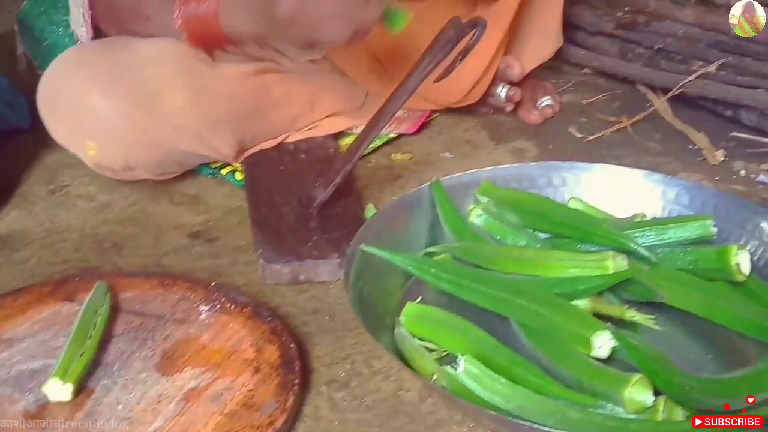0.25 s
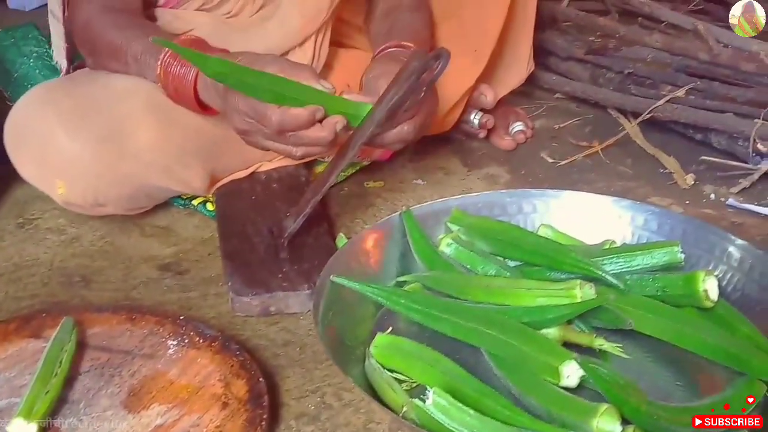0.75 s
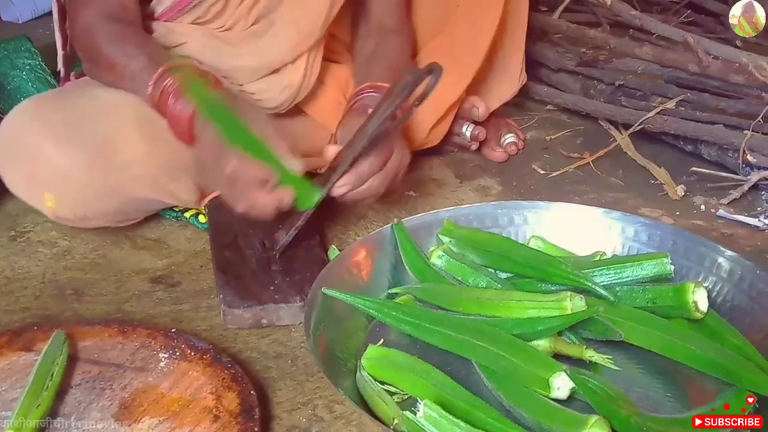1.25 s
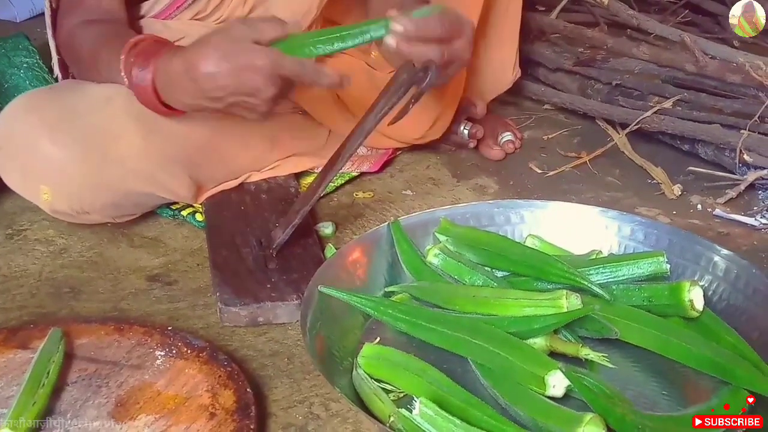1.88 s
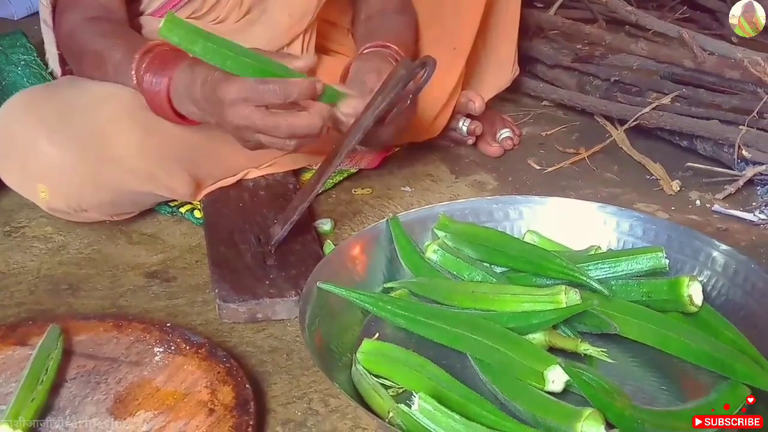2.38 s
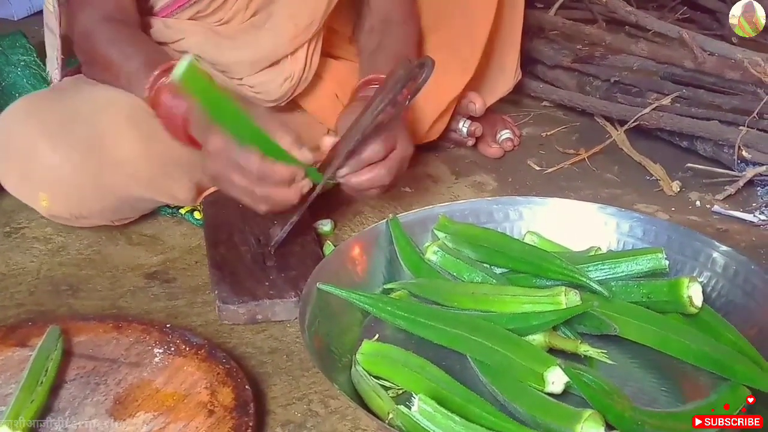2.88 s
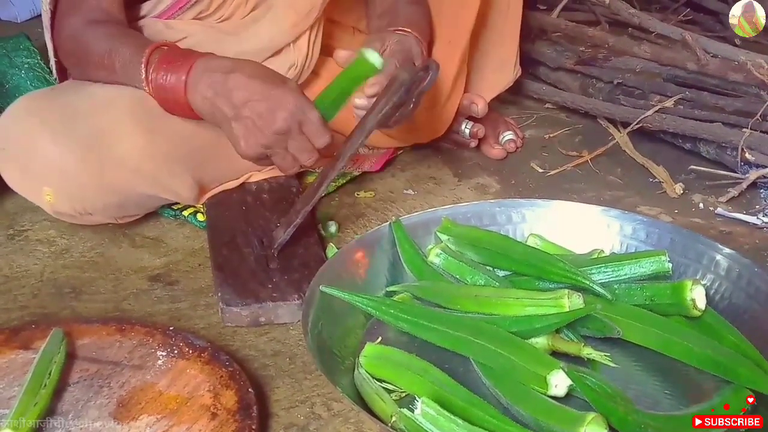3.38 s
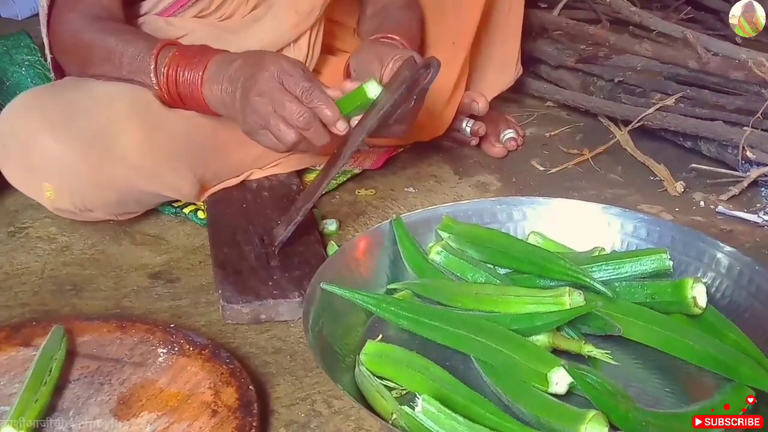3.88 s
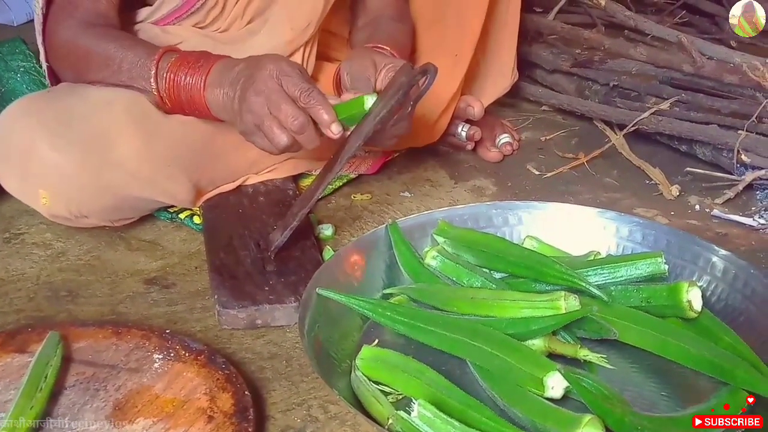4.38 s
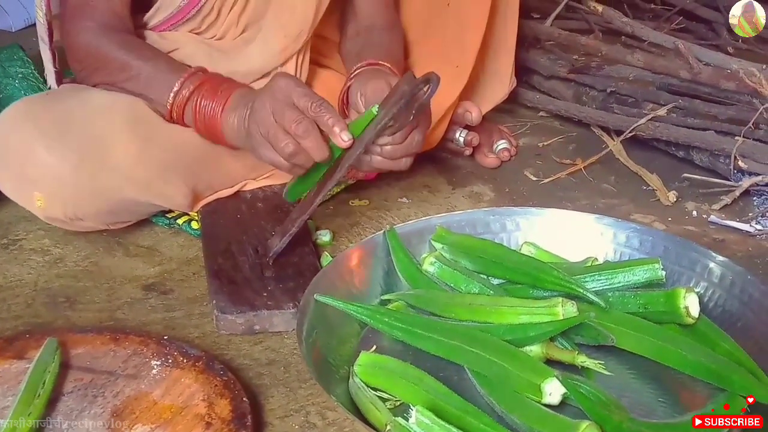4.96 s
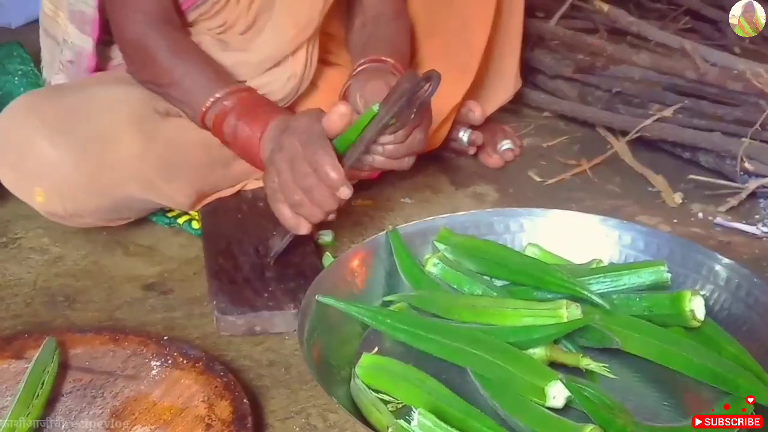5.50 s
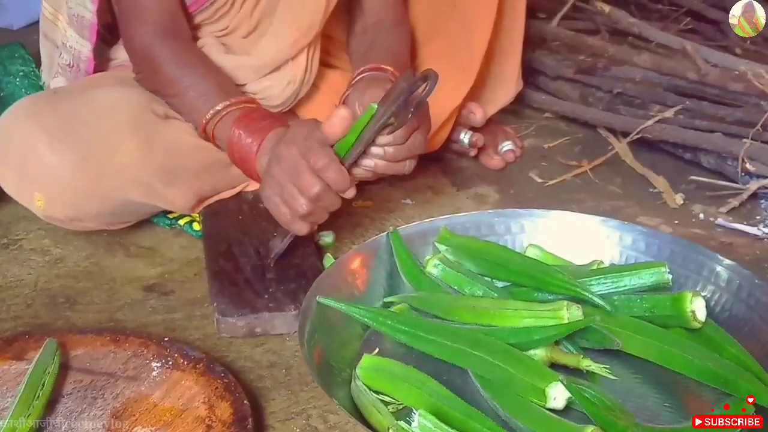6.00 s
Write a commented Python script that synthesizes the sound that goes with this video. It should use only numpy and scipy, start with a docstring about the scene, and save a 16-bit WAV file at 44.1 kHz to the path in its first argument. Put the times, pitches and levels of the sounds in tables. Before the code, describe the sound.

Hens cluck constantly in short hoarse notes, with occasional louder squawks and faint whines. Close by, okra skin rasps on a fixed iron blade and the pods snap in crisp crackles, while glass bangles clink high and bright and cloth rustles softly. A low uneven hum and a few dull thuds join halfway. Mono microphone near the hands in a hard-walled yard with short echoes, the pauses cleaned of hiss.

```python
"""Hens squawk and cluck in a hard-walled yard while cloth and hands rustle and glass bangles clink throughout.
Okra pods rasp and snap on a fixed blade: filtered noise with uneven pressure or a dying crackle.
Hen voices are rough pulses through beak resonances; bangles ring in modes.
A low uneven hum of filtered noise comes up halfway through, with a few dull sine thuds.
Sparse echoes surround the hens, the pods and the bangles; a noise suppressor and a band limit end the chain."""
import sys
import numpy as np
from scipy import signal
from scipy.fft import rfft, irfft, next_fast_len
from scipy.io import wavfile
from scipy.ndimage import uniform_filter1d, map_coordinates

SR = 44100
rng = np.random.default_rng(int(sys.argv[2]) if len(sys.argv) > 2 else 0)


def generate_wav(sig):
    """Save sig (samples, or channels by samples) to the path in sys.argv[1] as 16-bit PCM at SR."""
    pcm = np.round(np.clip(np.atleast_2d(sig).T, -1, 1) * 32767).astype(np.int16)
    wavfile.write(sys.argv[1], SR, pcm)


N = 275184
TIME = np.arange(N) / SR  # s

# throat with the beak nearly shut: (frequency [Hz], level [dB])
SHUT_BEAK_SPECTRUM = [(150, -54), (320, -5.5), (480, -10.5), (700, -11.5), (960, 2.5), (1150, -13),
                      (1420, -0.5), (1750, -51), (2400, -32), (3100, -23.5), (4800, -22.5), (6500, -32.5),
                      (10000, -33.5), (15000, -52)]
CHEST_PER_DB = 0.94  # dB of chest tone per dB of call level
UNSTEADY, UNSTEADY_HZ = 0.011, 70.15  # chance bends of the pitch: share and rate


def amp(db):
    """Decibels to gain."""
    return 10 ** (np.asarray(db) / 20)


def unit(x):
    """Scales to rms 1."""
    return x / np.sqrt(np.mean(x ** 2) + 1e-20)


def read(points, hz):
    """Reads a table on a log-frequency axis."""
    f, value = np.transpose(points)
    return np.interp(np.log(hz + 1), np.log(f + 1), value)


def add(mix, s, sound):
    """Mixes a sound in at time s."""
    part = mix[max(0, round(s * SR)):][:len(sound)]
    part += sound[:len(part)]


def colour(x, points, tilt_db=0):
    """Filters by a spectrum, tilted in dB per octave; rms 1."""
    size = next_fast_len(len(x) + 1024)
    hz = np.fft.rfftfreq(size, 1 / SR)
    gain = amp(read(points, hz) + tilt_db * np.log2(1 + hz / 500))
    return unit(irfft(rfft(x, size) * gain, size)[:len(x)])


def waver(count, hz):
    """Smooth chance of rms about 1, changing hz times a second."""
    at = np.arange(count) * hz / SR
    return map_coordinates(rng.standard_normal(4096), [at + 2], order=2, mode="wrap")


def resonate(x, hz, width):
    """A resonance that follows the curve hz, applied twice for steep sides; rms 1."""
    turn = np.exp(2j * np.pi * np.cumsum(hz) / SR)
    r = np.exp(-np.pi * width / SR)
    # shift the resonance to 0 Hz, low-pass with a double pole, shift back
    low = signal.lfilter([1], [1, -2 * r, r * r], x / turn)
    return unit((turn * low).real)


def yard(x, wet_db):
    """Adds the echoes of walls and ground: sparse taps, each band dying at its own speed."""
    # (frequency [Hz], t60 [s])
    decay_points = [(150, 0.15), (500, 0.23), (1200, 0.39), (5000, 0.39), (9000, 0.3), (15000, 0.087)]
    slots = np.arange(130, SR - 22, 22)
    taps = np.zeros(SR)
    taps[slots + rng.integers(0, 22, len(slots))] = rng.choice([-1., 1.], len(slots))
    hz, t, z = signal.stft(taps, SR, nperseg=256)
    decay = amp(-60 * t / read(decay_points, hz)[:, None])
    tail = signal.istft(z * decay, SR, nperseg=256)[1]
    wet = signal.fftconvolve(x, tail / np.linalg.norm(tail))[:N]
    return (x + amp(wet_db) * wet) / np.hypot(1, amp(wet_db))


def background():
    """Hands and cloth rustle in shifting patches over very still air."""
    # (time [s], level [dB])
    rustle_levels = [(0, -54), (.4, -72.5), (.9, -63.5), (1.35, -70), (1.9, -90), (2.7, -58.5),
                     (3.1, -62.5), (3.35, -65.5), (4.1, -59), (4.6, -58), (5.2, -66), (5.5, -58.5),
                     (5.9, -57.5), (6.24, -65.5)]
    # (frequency [Hz], level [dB per Hz])
    rustle_spectrum = [(60, -49), (200, -13), (350, -5), (700, 6.5), (1100, 1), (1800, -0.5), (2400, 1),
                       (3100, -12), (4500, 4.5), (6000, 3.5), (8000, -10), (11000, -5), (16000, -52)]
    # (frequency [Hz], level [dB per Hz])
    air_spectrum = [(30, 10.5), (150, 19), (400, 11), (1000, -30), (4000, 6.5), (15000, 2)]
    z = signal.stft(colour(rng.standard_normal(N), rustle_spectrum), nperseg=1024)[2]
    patches = uniform_filter1d(rng.standard_normal(z.shape), size=6, axis=0)
    patches = unit(uniform_filter1d(patches, size=8, axis=1))
    rustle = unit(signal.istft(z * amp(4.5 * patches), nperseg=1024)[1][:N])
    air = amp(-68) * colour(rng.standard_normal(N), air_spectrum)
    return amp(np.interp(TIME, *np.transpose(rustle_levels))) * rustle + air


def bangles():
    """Each clink rings two glass hoops of different size, and their neighbours on the wrist chatter along."""
    # two bangles meet: (time [s], relative level [dB], ring of the struck one [Hz],
    # ring of its neighbour [Hz], relative level of the lower modes [dB])
    clink_table = [(.014, -43.5, 14500, 12040, 5.5), (.065, -49.5, 12500, 10000, -14),
                   (.0995, -41, 12230, 9680, -2.5), (0.204, -50, 10660, 12070, 1.5),
                   (.786, -56.5, 14300, 9450, 3), (1.236, -47, 11250, 12500, 2.5),
                   (1.602, -62.5, 10840, 11810, 8), (2.86, -53, 13760, 9840, -10),
                   (3.1313, -49.5, 10700, 12100, 1), (3.17, -54, 10760, 12300, 4),
                   (3.493, -52.5, 13700, 9770, -8), (3.642, -56, 10970, 15500, -13),
                   (4.441, -56, 12200, 9680, 6.5), (4.849, -57, 14400, 10300, 1),
                   (5.179, -52, 10190, 11700, -4.5), (5.433, -49.5, 10630, 11300, -16),
                   (5.517, -49, 10800, 12100, 2.5), (5.585, -47, 11580, 10640, -1),
                   (5.626, -46.5, 9990, 15300, -21), (5.831, -46, 9800, 15400, -6),
                   (5.9569, -53, 12780, 9840, 0), (6.124, -42, 10930, 11860, 1)]
    # modes of a bangle: (multiple of its main ring, relative level [dB], t60 [s])
    mode_table = [(1, 0, 0.22), (.93, 3.5, 0.049), (1.07, -3.5, 0.14), (.526, 0, 0.15), (.49, -1, 0.067)]
    # glass on glass: (frequency [Hz], level [dB per Hz])
    tick_spectrum = [(300, -72), (2500, -40), (5500, -3.5), (8000, 0), (12000, -1)]
    neighbour_db = -6.5  # main modes and tick of the neighbour against the struck one
    out, t = np.zeros(N), np.arange(SR // 3) / SR
    for s, clink_db, struck_hz, neighbour_hz, low_db in clink_table:
        for hz, db in ((struck_hz, clink_db), (neighbour_hz, clink_db + neighbour_db)):
            for ratio, mode_db, t60 in mode_table:
                # both hoops share one level for their lower modes
                strike_db = db + 2 if ratio > .7 else clink_db + low_db - 3
                ring = np.sin(2 * np.pi * (hz * ratio * t + rng.random()))
                mode_hz = np.full(len(t), hz * ratio)
                chatter = resonate(rng.standard_normal(len(t)), mode_hz, width=490)
                decay = amp(strike_db + mode_db - 60 * t / t60)
                add(out, s, decay * (.6 * ring + .55 * chatter))
            tick = colour(rng.standard_normal(len(t)), tick_spectrum) * np.exp(-t / 0.0087)
            add(out, s, amp(db - 0.5) * tick)
    high_pass = signal.butter(4, 3000, "high", fs=SR, output="sos")
    return yard(signal.sosfilt(high_pass, out), wet_db=-2.5)


def syrinx(hz, rough, jitter, doubling, chest_db=0):
    """Jittery pulses, alternately strong and weak, with a puff of air in each cycle."""
    count = len(hz)
    turns = np.cumsum(hz * (1 + jitter * rough ** 1.5 * waver(count, 420))) / SR
    # the windpipe delays each overtone differently, which spreads the pulse over its cycle
    overtones = sum(np.cos(2 * np.pi * (k * turns - rng.random())) for k in range(2, 19))
    # hoarseness shakes the overtones, while the chest tone stays clear
    shake = 1 + doubling * rough * np.cos(np.pi * turns) + 1.6 * rough ** 2 * waver(count, 260)
    folds = amp(chest_db) * np.cos(2 * np.pi * turns) + shake * overtones
    puffs = (0.082 + np.exp(-(turns % 1) / 0.22)) * rng.standard_normal(count)
    return (1 - rough) * unit(folds) + rough ** 2 * unit(puffs)


def squawks():
    """Loud calls: beak opens, pitch sags, mouth resonance slides, voice is hoarsest in mid-call."""
    # (time [s], length [s], relative level [dB], swell over the call [dB], first pitch [Hz],
    # pitch it sags towards [Hz], first mouth resonance [Hz], last mouth resonance [Hz],
    # upper resonance [Hz], its relative level [dB], roughness [0-1])
    squawk_table = [(0.063, 0.12, -39.5, -5, 730, 601.4, 1420, 1170, 2234, -10.5, 0.45),
                    (0.563, 0.18, -37, -2.5, 569.5, 449.6, 1170, 1300, 3820, -23, 0.52),
                    (2.901, 0.11, -38, 3, 772.3, 599, 1510, 1130, 2250, -11.5, 0.56),
                    (3.432, 0.1, -39, 4.5, 521, 403, 1150, 870, 4070, -24, 0.58),
                    (3.492, 0.12, -40.5, -6.5, 686, 510.2, 1570, 1520, 2470, -9.5, 0.53),
                    (3.754, 0.086, -39, 2.5, 549, 402, 1080, 750, 4150, -16.5, 0.58),
                    (4.182, .16, -31.5, 1, 562, 509.8, 1200, 1410, 4110, -20.5, 0.47)]
    # throat with the beak open: (frequency [Hz], level [dB])
    open_beak_spectrum = [(150, -21), (300, -10), (420, -0.5), (520, 2.5), (660, -6), (1000, -1.5),
                          (1500, 1.5), (1900, -8.5), (2600, -7), (3100, -12.5), (4200, -13.5), (6300, -17),
                          (8500, -23), (15000, -20.5)]
    attack_s, release_s, beak_open_s = 0.017, 0.019, 0.016
    sag_s = 0.04  # time constant
    clear_share = 0.65  # share of the roughness at either end
    average_db, chest_db, upper_q = -35.5, -1.5, 2.9
    # the harder the call, the more treble
    treble_db, treble_per_db, treble_hz = 1, 1.25, 3140
    high_pass = signal.butter(2, treble_hz, "high", fs=SR, output="sos")
    out = np.zeros(N)
    for (s, length, db, swell_db, first_hz, last_hz, first_mouth_hz, last_mouth_hz,
         upper_hz, upper_db, rough) in squawk_table:
        t = np.arange(0, length, 1 / SR)
        along = t / length
        hz = last_hz + (first_hz - last_hz) * np.exp(-t / sag_s)
        hz = hz * (1 + UNSTEADY * waver(len(t), UNSTEADY_HZ))
        mouth_hz = first_mouth_hz + (last_mouth_hz - first_mouth_hz) * along
        hoarse = rough * (clear_share + (1 - clear_share) * np.sin(np.pi * along))
        envelope = np.minimum(t / attack_s, 1) * np.minimum((length - t) / release_s, 1)
        opening = np.minimum(t / beak_open_s, 1)
        drive = syrinx(hz, np.clip(hoarse, 0, 1), jitter=.08, doubling=1.45,
                       chest_db=chest_db + CHEST_PER_DB * (db - average_db))
        throat = opening * colour(drive, open_beak_spectrum)
        throat = throat + (1 - opening) * colour(drive, SHUT_BEAK_SPECTRUM)
        mouth = resonate(drive, mouth_hz, width=710)
        upper = resonate(drive, np.full(len(t), upper_hz), width=upper_hz / upper_q)
        voice = 0.64 * throat + .5 * mouth + amp(upper_db) * upper
        level_db = db + swell_db * (along - .5)
        treble = signal.sosfiltfilt(high_pass, voice)
        treble_gain = opening * amp(treble_db + treble_per_db * (level_db - average_db))
        voice = voice - treble + treble * treble_gain
        add(out, s, amp(level_db) * envelope * unit(voice))
    return yard(out, wet_db=-1.5)


def clucks():
    """Short hoarse notes through a nearly shut beak: pitch and resonances arch, then sink as it closes."""
    # (time [s], length [s], relative level [dB], nominal mouth resonance [Hz])
    cluck_table = [(.279, 0.07, -43.5, 1230), (0.494, 0.051, -47.5, 1450), (0.52, .028, -39, 1090),
                   (.977, 0.059, -51, 1180), (1.24, 0.037, -50, 1180), (1.467, 0.058, -42.5, 1140),
                   (1.708, 0.045, -43, 1110), (1.928, 0.097, -42, 1176), (2.137, .058, -49, 950),
                   (2.291, 0.034, -48, 895), (2.61, 0.08, -50.5, 1110), (2.812, 0.042, -47, 1060),
                   (3.142, 0.054, -44, 1190), (3.183, 0.063, -37, 1180), (3.373, 0.056, -44, 1050),
                   (3.675, .055, -46.5, 1170), (3.911, 0.055, -50, 1160), (4.109, 0.07, -36.5, 1270),
                   (4.509, .037, -49, 1140), (4.641, 0.046, -50, 1134), (4.735, 0.0447, -38, 1214),
                   (4.841, 0.063, -49, 1130), (4.992, 0.058, -46.5, 1290), (5.053, 0.024, -44.5, 1040),
                   (5.244, 0.048, -44, 1194), (5.47, 0.063, -50, 1130), (5.528, 0.045, -42, 1080),
                   (5.684, 0.047, -47.5, 1070), (5.882, 0.039, -43, 1110), (6.109, 0.064, -47, 1110)]
    # an average cluck; a louder one is a little higher, with more chest tone and less upper resonance
    average_db, average_hz, chest_db, upper_base_db = -45, 483.3, 0, -13
    hz_per_db, upper_per_db = 1.42, -0.83
    out = np.zeros(N)
    for s, length, db, mouth_hz in cluck_table:
        effort_db = db - average_db
        hz = average_hz + hz_per_db * effort_db
        along = np.linspace(0, 1, int(length * SR))
        arch = abs(np.sin(np.pi * along ** .9))
        opening = 0.984 + 0.093 * arch - 0.14 * along
        bend = .99 + 0.0599 * arch - 0.0793 * along + UNSTEADY * waver(len(along), UNSTEADY_HZ)
        drive = syrinx(hz * bend, 0.51, jitter=0.074, doubling=1.14,
                       chest_db=chest_db + CHEST_PER_DB * effort_db)
        mouth = resonate(drive, mouth_hz * opening, width=370)
        upper = resonate(drive, 2200 * opening, width=380)
        voice = unit(colour(drive, SHUT_BEAK_SPECTRUM) + 0.63 * mouth)
        voice = voice + amp(upper_base_db + upper_per_db * effort_db) * upper
        add(out, s, amp(db - 1.0) * voice * arch)
    return yard(out, wet_db=-1)


def whines():
    """Soft quavering notes from hens farther off: a wavering sine with a weak octave."""
    # (time [s], length [s], relative level [dB], first pitch [Hz], last pitch [Hz])
    whine_table = [(0.377, 0.044, -57, 678, 687), (0.412, 0.046, -51.5, 670, 653),
                   (0.46, .086, -53, 639, 602), (0.871, 0.043, -59, 285, 310), (1.141, 0.19, -66, 458, 443),
                   (2.699, 0.16, -69, 559, 384), (5.287, 0.092, -60, 355, 409),
                   (5.563, 0.22, -60, 696, 622), (5.624, 0.22, -64.5, 468, 424),
                   (5.926, .154, -59, 650, 637)]
    out = np.zeros(N)
    for s, length, db, first_hz, last_hz in whine_table:
        count = int(length * SR)
        hz = np.linspace(first_hz, last_hz, count) * (1 + 0.058 * waver(count, 247.0))
        phase = 2 * np.pi * np.cumsum(hz) / SR
        quaver = amp(1.6 * waver(count, 106))
        tone = unit(quaver * (np.sin(phase) + 0.1 * np.sin(2 * phase)))
        add(out, s, amp(db) * tone * signal.windows.tukey(count, .6))
    return yard(out, wet_db=3.0)


def rasps():
    """The bristly skin of a pod drags over the iron: countless tiny catches blur into a hiss."""
    # strokes along the edge: (time [s], length [s], relative level [dB])
    stroke_table = [(0.617, 0.16, -48), (1.077, .11, -46), (1.423, 0.053, -48.5), (1.958, 0.038, -46.5),
                    (2.039, 0.081, -48.5), (2.151, 0.3, -48), (2.606, 0.057, -44), (2.919, 0.11, -54.5)]
    # (frequency [Hz], level [dB per Hz])
    rasp_spectrum = [(150, -35), (500, -18.5), (750, -7.5), (1200, -7), (1900, -4), (2700, 0.5),
                     (3250, -6.5), (3700, 3.5), (4100, -7), (4900, 0.5), (6500, -1.5), (8000, -8),
                     (10300, -12.5), (11800, -31)]
    attack_s, release_s = 0.0047, 0.02
    wobble_db, wobble_hz = 1.73, 46  # the hand presses unevenly
    pressure = np.zeros(N)
    for s, length, db in stroke_table:
        t = np.arange(int((length + .15) * SR)) / SR
        release = np.exp(-np.maximum(t - length, 0) / release_s)
        add(pressure, s, amp(db) * np.minimum(t / attack_s, 1) * release)
    pressure = pressure * amp(wobble_db * waver(N, wobble_hz))
    catches = colour(rng.standard_normal(N) * amp(1.5 * waver(N, 500)), rasp_spectrum)
    return yard(pressure * catches, wet_db=-4.0)


def cuts():
    """The pod wall cracks at once, then its fibres part in a dying crackle."""
    # (time [s], relative level [dB], decay constant of the tearing [s], brightness [dB per octave])
    cut_table = [(.788, -43.5, 0.042, 0), (.889, -52.5, 0.033, -8), (1.119, -39, 0.066, 3),
                 (1.173, -38.5, 0.028, 15), (1.706, -36, 0.0056, 8.5), (1.717, -42.5, .035, 8),
                 (2.785, -48, 0.21, 3), (2.821, -36.5, 0.018, 2), (4.666, -48.5, .042, 4),
                 (4.69, -46.5, 0.052, 1), (4.924, -48, .036, 0), (5.06, -58, 0.093, 1.5),
                 (5.279, -47.5, 0.038, 6), (5.551, -52.5, 0.27, -3), (5.625, -39, 0.052, -3),
                 (5.644, -34.5, 0.0075, -3), (5.792, -34.5, .017, -1.5), (5.809, -33.5, 0.034, -5.5),
                 (6.213, -50.5, 0.081, 2.5)]
    # (frequency [Hz], level [dB per Hz])
    pod_spectrum = [(60, -67), (250, -36), (500, -16), (900, -11), (1900, 0.5), (3000, -5), (4500, 1),
                    (6200, 1), (8500, -8.5), (12000, -11), (16000, -19)]
    out, t = np.zeros(N), np.arange(SR // 5) / SR
    for s, db, decay_s, bright_db in cut_table:
        fibres = rng.standard_normal(len(t)) * amp(4.5 * waver(len(t), 900))
        add(out, s, amp(db - 2.5) * colour(fibres, pod_spectrum, bright_db) * np.exp(-t / decay_s))
    return yard(out, wet_db=-6.5)


def hum():
    """A low, lumpy hum of filtered noise that swells and drops, and once holds a higher tone."""
    # (time [s], level [dB])
    hum_levels = [(0.0, -78), (2.26, -78), (2.9, -69), (3.18, -54.5), (3.79, -63), (3.84, -55),
                  (4.81, -57.5), (4.85, -71.5), (5.13, -56.5), (5.42, -72.5), (5.65, -56), (5.68, -71),
                  (5.8, -58), (6.24, -52.5)]
    # (frequency [Hz], level [dB per Hz])
    hum_spectrum = [(25, -60), (50, -47.5), (75, -3), (120, 5.5), (160, -1), (200, -0.5), (240, -31),
                    (330, -27), (600, -101)]
    # the higher tone: (time [s], length [s], level [dB], frequency [Hz])
    tone_settings = (3.5, 0.18, -55.5, 210)
    lump_db, lump_hz = 2, 11  # depth and rate of chance swells
    level_db = np.interp(TIME, *np.transpose(hum_levels)) + lump_db * waver(N, lump_hz)
    out = amp(level_db) * colour(rng.standard_normal(N), hum_spectrum)
    s, length, db, hz = tone_settings
    count = int(length * SR)
    tone = resonate(rng.standard_normal(count), np.full(count, hz), width=41)
    add(out, s, amp(db) * tone * signal.windows.tukey(count, .4))
    return out


def bumps():
    """Dull thuds on the ground: low sines that die within a few cycles."""
    # (time [s], relative level [dB], pitch [Hz])
    bump_table = [(3.151, -43, 91.4), (4.518, -40.5, 75), (6.063, -42, 132)]
    out, t = np.zeros(N), np.arange(SR // 6) / SR
    for s, db, hz in bump_table:
        envelope = np.minimum(t / 0.017, 1) * np.exp(-t / 0.02)
        add(out, s, amp(db) * np.sin(2 * np.pi * hz * t) * envelope)
    return out


def suppress(x, threshold_db, depth_db):
    """Noise suppressor: turns down the parts of the spectrum that lie under a threshold."""
    z = signal.stft(x, nperseg=512, noverlap=384)[2]
    power = uniform_filter1d(abs(z) ** 2, size=5, axis=-1)
    keep = power / (power + amp(threshold_db) ** 2)
    return signal.istft(z * amp(-depth_db * (1 - keep)), nperseg=512, noverlap=384)[1][:, :N]


def scene():
    """Hens, kitchen work and background at one microphone."""
    hens = squawks() + clucks() + whines()
    work = rasps() + cuts() + bangles()
    return (hens + work + hum() + bumps() + background())[None]


def record(dry):
    """Noise suppression, then the recorder's band limit."""
    edge_hz = 15900
    clean = suppress(dry, threshold_db=-81.0, depth_db=16.0)
    low_pass = signal.firwin(511, edge_hz, window=("kaiser", 9), fs=SR)
    return signal.oaconvolve(clean, low_pass[None], "same")


dry = scene()
out = record(dry)
generate_wav(out)
```